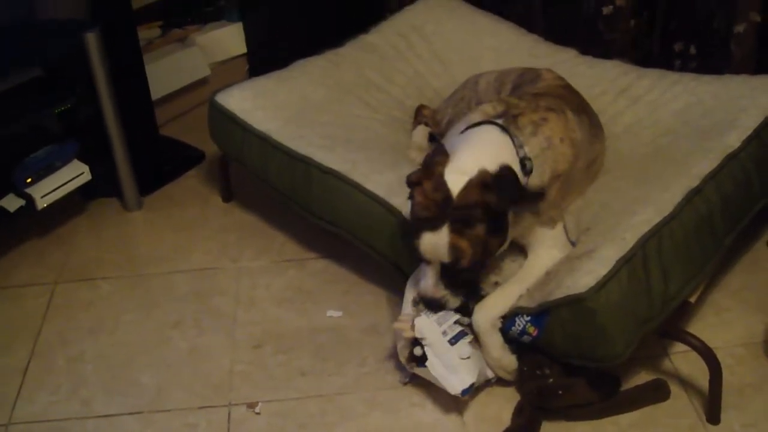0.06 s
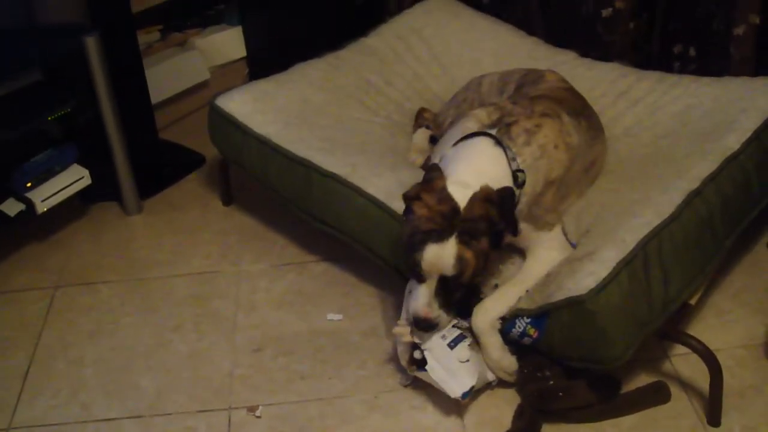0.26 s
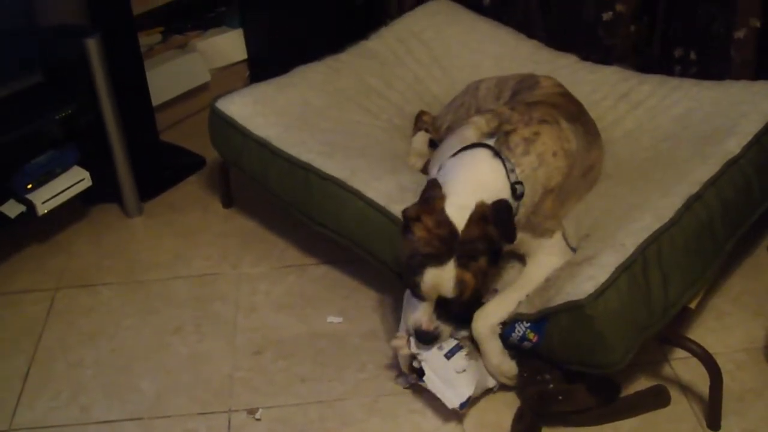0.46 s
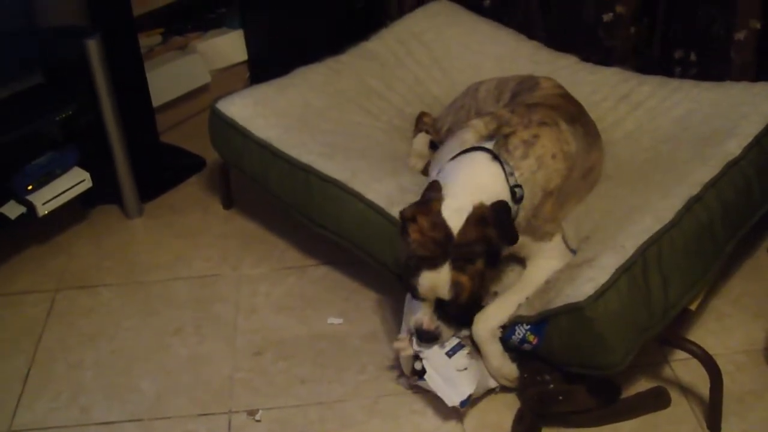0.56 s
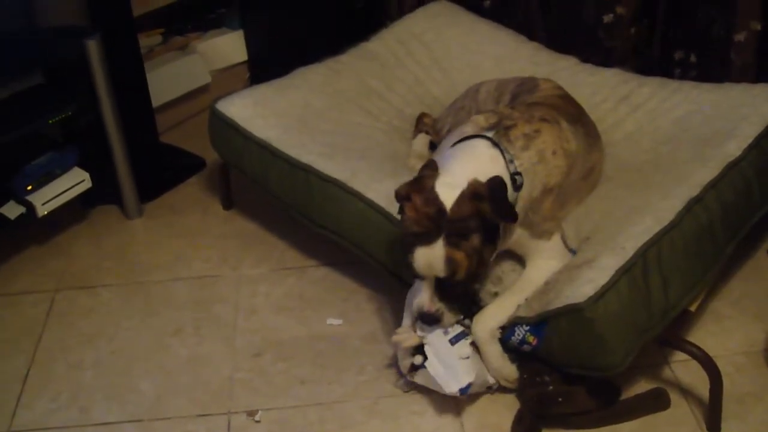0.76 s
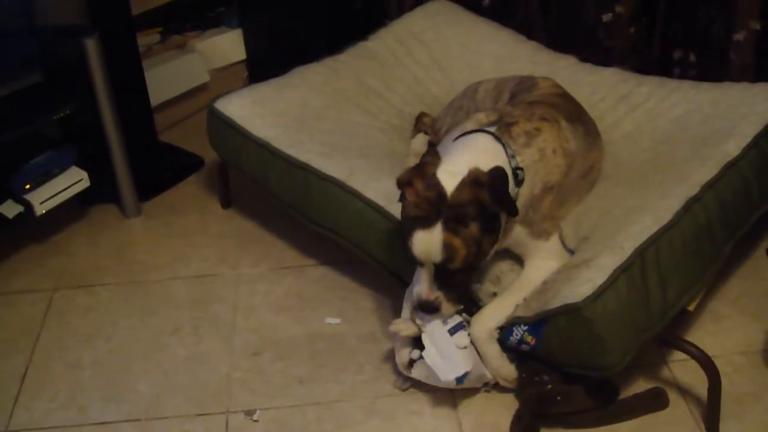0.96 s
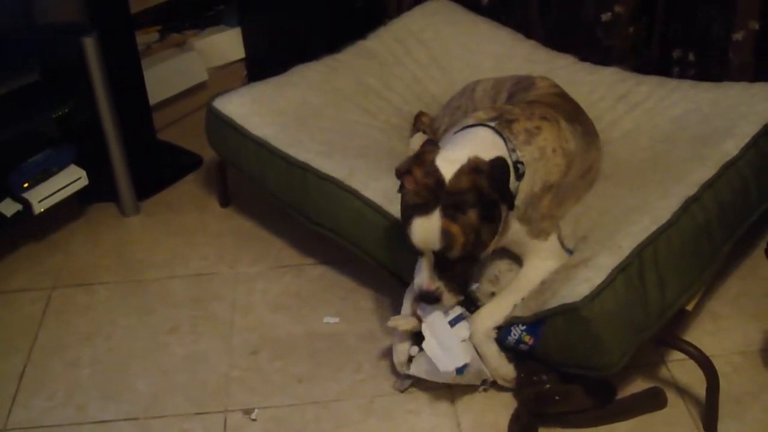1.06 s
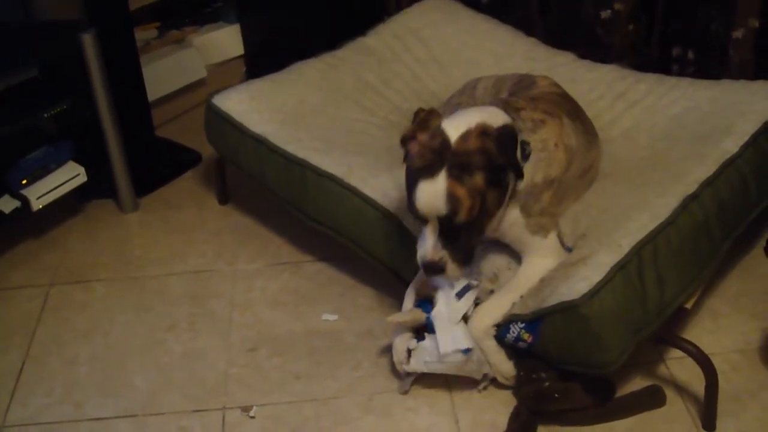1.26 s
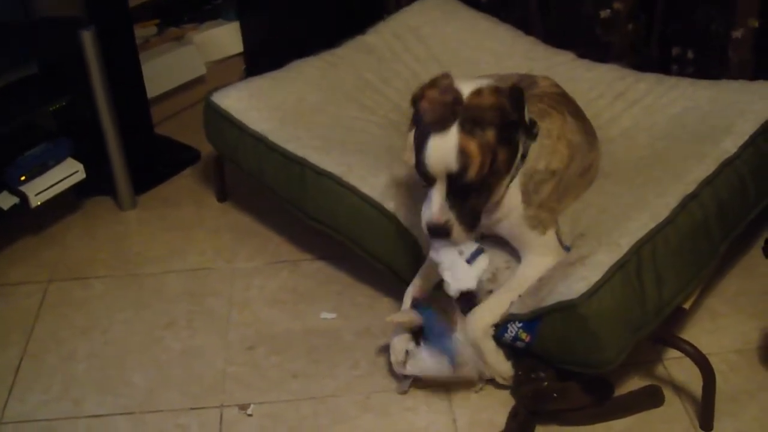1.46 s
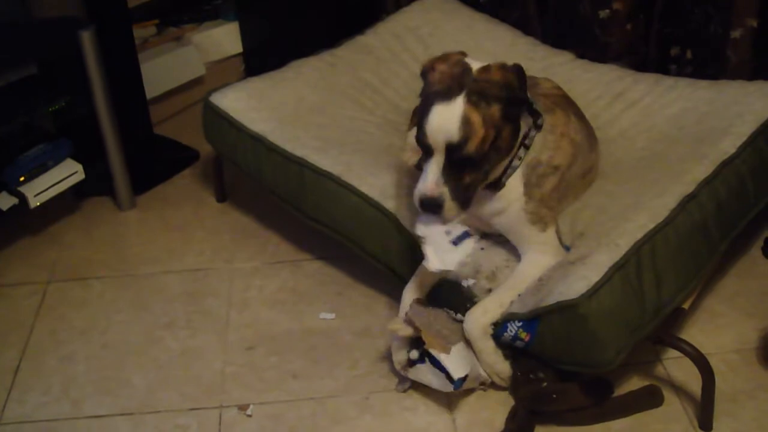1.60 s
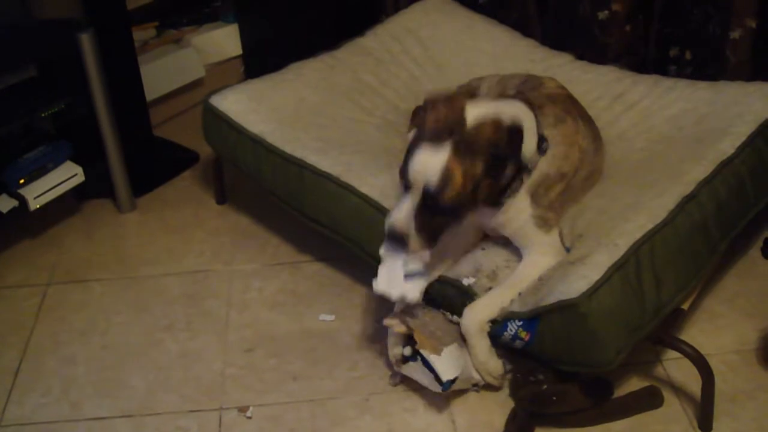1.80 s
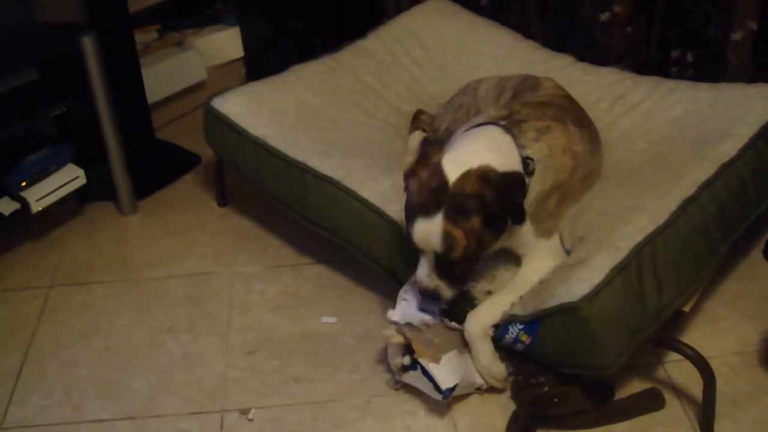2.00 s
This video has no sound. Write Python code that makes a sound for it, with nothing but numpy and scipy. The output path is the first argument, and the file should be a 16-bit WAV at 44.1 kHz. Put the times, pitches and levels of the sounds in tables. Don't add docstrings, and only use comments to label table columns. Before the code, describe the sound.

A padded paper envelope is ripped by a dog, with quiet sniffs and light clicks first, a half-second burst of crackle, rustle and dull paw jolts, then room hiss and low hum; close stereo, live tiled room.

```python
import sys
import numpy as np
from scipy import signal
from scipy.fft import rfft, irfft, next_fast_len
from scipy.io import wavfile
from scipy.ndimage import uniform_filter1d, map_coordinates

SR = 44100
rng = np.random.default_rng(int(sys.argv[2]) if len(sys.argv) > 2 else 0)


def int16_out(signal):
    q = np.round(np.clip(np.atleast_2d(signal).T, -1, 1) * 32767)
    wavfile.write(sys.argv[1], SR, q.astype(np.int16))


def boost_factor(decibels):
    exponent = np.asarray(decibels, float) / 20
    return 10 ** exponent


N = 89919


def unit(x):
    return x / np.sqrt(np.mean(x ** 2) + 1e-20)


def along(points, hz):
    f, value = np.transpose(points)
    return np.interp(np.log(hz + 1), np.log(f + 1), value)


def filtered(x, response):
    m = next_fast_len(N + 8192)
    gain = response(np.fft.rfftfreq(m, 1 / SR))
    return irfft(rfft(x, m) * gain, m)[..., :N]


def coloured(x, curve):
    return filtered(x, lambda f: boost_factor(along(curve, f)))


def wobble(rate):
    knots = rng.standard_normal(int(N * rate / SR) + 4)
    return map_coordinates(knots, [np.arange(N) * rate / SR])


def patchy(patchy_db):
    z = signal.stft(rng.standard_normal(N + 512), nperseg=256)[2]
    field = uniform_filter1d(rng.standard_normal(z.shape), size=6, axis=0)
    field = uniform_filter1d(field, size=6, axis=1)
    return signal.istft(z * boost_factor(patchy_db * unit(field)), nperseg=256)[1][:N]


def cracks(s, gain, hz, cycles, phase, size=256):
    hz = np.clip(hz, 150, SR / 4)[:, None]
    start = np.floor(s * SR).astype(int)[:, None] + 1
    place = start + np.arange(size)
    turns = (place / SR - s[:, None]) * hz
    onset = 1 - np.exp(-3 * turns)
    wave = np.sin(2 * np.pi * turns + np.c_[phase]) * np.exp(-2 * turns / np.c_[cycles]) * onset
    return np.bincount(place.ravel(), (gain[:, None] * wave).ravel(), N + SR)[:N]


# f/Hz, level/dB
MIDDLE_HISS = [(25, -50), (60, -20), (146, -17), (300, -5), (520, -7.5), (1200, -10.5), (3000, -14.5),
               (11100, -19.5)]
# f/Hz, level/dB
WIDE_HISS = [(25, -52), (60, -21), (350, -8), (570, -9.5), (1200, -14.5), (2560, -22), (11100, -28.5)]
# f/Hz, level/dB
HUM_TONES = [(119.5, -64.5), (158, -59)]
# f/Hz, width/Hz, level/dB
CASING_BANDS = [(800, 74, -58), (2040, 60, -67)]


def air():
    t = np.arange(N) / SR
    mid = boost_factor(-45.5 + 0.2 * wobble(5.9)) * unit(coloured(patchy(patchy_db=-0.15), MIDDLE_HISS))
    side = boost_factor(-41 + 0.2 * wobble(3.8)) * unit(coloured(patchy(patchy_db=0.8), WIDE_HISS))
    for hz, db in HUM_TONES:
        level = boost_factor(db + 2 + 0.28 * wobble(8.5))
        mid = mid + level * np.sin(2 * np.pi * hz * t + 0.3 * wobble(6.1))
    for hz, width, db in CASING_BANDS:
        band = filtered(rng.standard_normal(N), lambda f: np.exp(-0.5 * ((f - hz) / width) ** 2))
        mid = mid + boost_factor(db + 1.2 * wobble(3.8)) * unit(band)
    return np.array([mid + side, mid - side])


# start t/s, length/s, level/dB, centre f/Hz
SNIFFS = [
    (0.12, 0.18, -47.5, 3600),
    (0.34, .25, -48.5, 4700),
    (0.7, 0.1, -48, 850),
    (0.774, 0.17, -42, 4300),
    (0.987, 0.2, -47, 1300),
    (1.9, 0.1, -47.5, 4200),
    (1.667, .2, -53, 810),
    (0.59, 0.23, -54, 4300),
    (0.13, 0.61, -49.5, 2100),
    (0.51, 0.32, -52, 1000),
]


def snuffles():
    octaves, rise = 1.73, 0.3
    t, out = np.arange(N) / SR, np.zeros(N)
    for s, length, db, hz in SNIFFS:
        u = np.clip((t - s) / length, 0, 1)
        swell = np.sin(np.pi / 2 * np.minimum(u / rise, (1 - u) / (1 - rise)))
        band = lambda f: np.exp(-0.5 * (np.log2((f + 1) / hz) / octaves) ** 2)
        level = boost_factor(db + 0.72 * wobble(61.2))
        out = out + level * swell * unit(filtered(patchy(patchy_db=2.3), band))
    return out


# start t/s, length/s, level/dB, centre f/Hz
FIBRE_BURSTS = [(1.0733, 0.0075, -21.5, 3020), (1.083, .012, -30, 7600), (1.094, 0.0063, -43, 7500),
                (1.134, .012, -27, 3080), (1.152, .018, -20.5, 1760), (1.174, 0.02, -32, 1510),
                (1.166, 0.0069, -27, 6150), (1.215, 0.01248, -24.5, 910), (1.228, 0.015, -24, 6500),
                (1.244, 0.011, -22, 1140), (1.28, 0.0041, -19.5, 6160), (1.29, .024, -22.5, 7500),
                (1.32, 0.0068, -26, 5200), (1.376, .008, -26.5, 4000), (1.369, 0.016, -22.5, 5330),
                (1.3882, .008, -11.5, 5280), (1.392, 0.012, -20, 800), (1.409, .008, -18.5, 6500),
                (1.42, 0.021, -24.5, 3000), (1.474, 0.0043, -13.5, 5600), (1.48, 0.019, -21.5, 2810),
                (1.493, 0.01, -24.5, 3980), (1.422, .03, -29.5, 302), (1.484, .05, -30, 450),
                (1.514, .03, -30.5, 2000), (0.745, 0.031, -40, 2720), (1.881, 0.012, -42.5, 3440),
                (0.381, 0.0098, -39.5, 2570), (0.429, 0.037, -48, 2800)]
# f/Hz, level/dB
FIBRE_TONE = [(200, -2.5), (1000, -1), (4000, 0), (11000, 4.5)]


def tearing(count=80):
    attack_s, t60_s = 0.0008, 0.016
    s, length, db, hz = [np.repeat(c, count) for c in np.transpose(FIBRE_BURSTS)]
    u = rng.random((len(s), 5))
    span = length + t60_s / 2
    age = (np.arange(len(s)) % count + u[:, 0]) / count * span
    fade = boost_factor(-60 * np.clip(age - length, 0, None) / t60_s)
    shape = np.clip(age / attack_s, 0, 1) * fade
    normal = np.sqrt(-2 * np.log(1 - u[:, 1])) * np.cos(2 * np.pi * u[:, 2])
    pitch = hz * np.exp(0.52 * normal)
    crowd = np.sqrt(pitch * span / count)
    size = boost_factor(5.5 * np.minimum(-np.log(1 - u[:, 3]), 2.2)).reshape(-1, count)
    size = (size / np.sqrt(np.mean(size ** 2, axis=1, keepdims=True))).ravel()
    gain = boost_factor(db + 6) * size * shape * crowd
    fibres = cracks(s + age, gain, pitch, cycles=1.74, phase=2 * np.pi * u[:, 4])
    return coloured(fibres, FIBRE_TONE)


# t/s, peak level/dB, f/Hz, ring/cycles
FOLDS = [(1.1113, -15, 2550, 2.9), (1.1495, -3.5, 1460, 2.16), (1.1503, -4, 2800, 2.9),
         (1.1496, -5, 5600, 0.93), (1.162, -7, 2530, 1.5), (1.173, -8.5, 8600, 6.3),
         (1.2642, 7.5, 3420, 1.04), (1.2704, 2, 6760, 1.7), (1.3395, -9, 8200, 1.6),
         (1.38, -12.5, 2410, 6.6), (1.4182, -1.5, 2800, 1.6), (1.4905, -19.5, 2340, 15),
         (1.48, -9.5, 4650, 13.5), (1.084, -15.5, 7600, 25), (0.3838, -35, 1250, 4),
         (.454, -30.5, 910, 2.5), (.639, -36, 800, 5), (0.7209, -19.5, 477, 0.6), (0.762, -32, 1840, 0.89),
         (.951, -16, 5600, 1), (0.969, -22, 2600, 2.2), (1.0165, -17, 7000, 1.6), (1.7, -31, 1670, 3),
         (1.928, -34, 2000, 13)]


def snaps():
    s, db, hz, cycles = np.transpose(FOLDS)
    return cracks(s, boost_factor(db), hz, cycles, np.pi, size=512)


# t/s, level/dB
STRAIN = [
    (1.068, -38),
    (1.075, -29.5),
    (1.16, -24.5),
    (1.21, -29.5),
    (1.289, -29),
    (1.36, -27.5),
    (1.4, -23),
    (1.48, -29),
    (1.58, -71),
]
# f/Hz, level/dB
PAPER_TONE = [(60, -62), (190, -7.5), (550, 0), (900, 2.5), (3000, -0.5), (6000, 0.5), (11100, -0.2)]


def rustle():
    s, db = np.transpose(STRAIN)
    t = np.arange(N) / SR
    pull_db = np.interp(t, s, db, left=-120, right=-120)
    strain = boost_factor(pull_db + 2 + 0.86 * wobble(90))
    spiky = patchy(patchy_db=3.0) * boost_factor(3.8 * wobble(2500) + 1.64 * wobble(400))
    return strain * unit(coloured(spiky, PAPER_TONE))


# t/s, peak level/dB, f/Hz, ring/cycles
JOLTS = [
    (1.069, -33, 275, 2.4),
    (1.156, -29, 230, 2.1),
    (1.236, -33, 316, 4.4),
    (1.425, -27.5, 186, 3.8),
    (1.473, -31, 174, 4.1),
]


def thuds():
    s, db, hz, cycles = np.transpose(JOLTS)
    return cracks(s, boost_factor(db), hz, cycles, np.pi, size=4096)


# f/Hz, t60/s
ROOM_DECAY = [(200, 0.56), (2000, 0.4), (10000, 0.3)]
# f/Hz, side level/dB
ROOM_WIDTH = [(150, -15), (500, -5), (2000, -5.5), (5000, -0.5), (11000, 0.5)]


def room(x):
    delay_s, early_t60_s = 0.003, 0.01
    hz, t, z = signal.stft(rng.standard_normal((2, SR * 3 // 4)), SR, nperseg=256)
    decay = boost_factor(-60 * t / along(ROOM_DECAY, hz)[:, None])
    tail = signal.istft(z * decay, SR, nperseg=256)[1]
    length = tail.shape[1]
    late = np.pad(tail, ((0, 0), (round(delay_s * SR), 0)))[:, :length]
    early = rng.standard_normal(tail.shape) * boost_factor(-60 * np.arange(length) / SR / early_t60_s)
    answer = boost_factor(-4.5) * late / np.linalg.norm(late[0])
    answer = answer + boost_factor(-7.5 + np.c_[[-10, 0]]) * early / np.linalg.norm(early[0])
    mid, side = signal.fftconvolve(x[None], answer, axes=1)[:, :N]
    side = coloured(side, ROOM_WIDTH)
    return np.array([mid + side, mid - side])


def scene():
    background = air()
    near = snuffles() + tearing() + snaps() + rustle() + thuds()
    near = filtered(near, lambda f: f ** 4 / (f ** 4 + 170 ** 4))
    pan_db = -0.2
    return near * boost_factor([[pan_db], [-pan_db]]) + room(near) + background


def low_pass(x):
    return signal.sosfilt(signal.butter(12, 11950, fs=SR, output="sos"), x)


def record(dry):
    limit, top_hz, bass_hz = 1.1, 11010, 90
    limited = limit * np.tanh(dry / limit)
    mix = filtered(limited, lambda f: (f < top_hz) * f ** 2 / (f ** 2 + bass_hz ** 2))
    return low_pass(mix)


dry = scene()
out = record(dry)
int16_out(out)
```